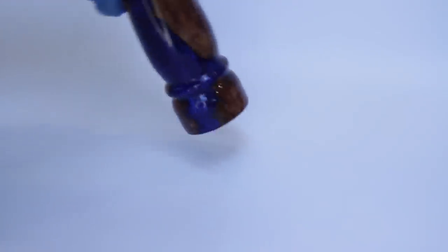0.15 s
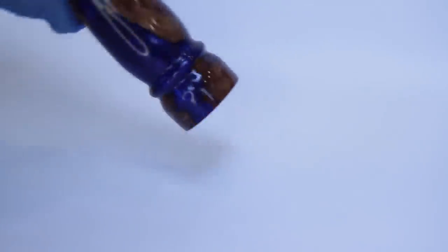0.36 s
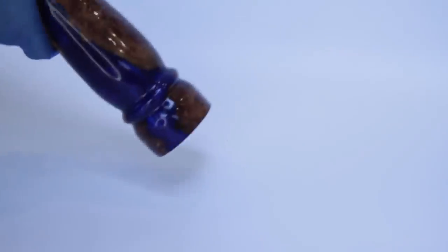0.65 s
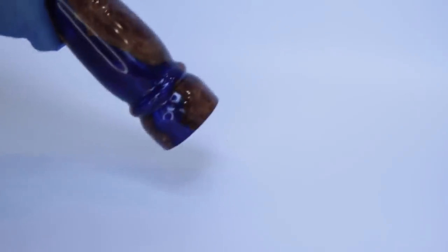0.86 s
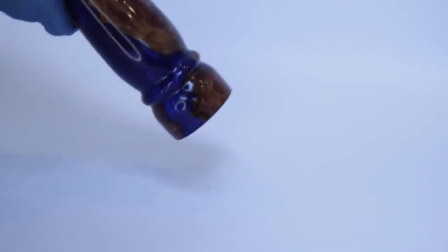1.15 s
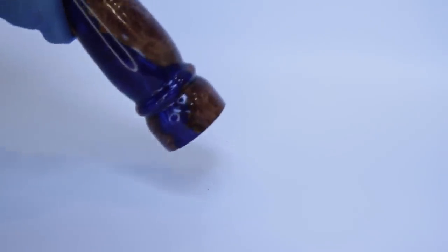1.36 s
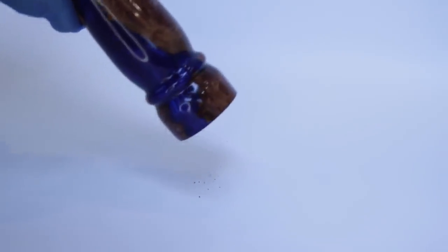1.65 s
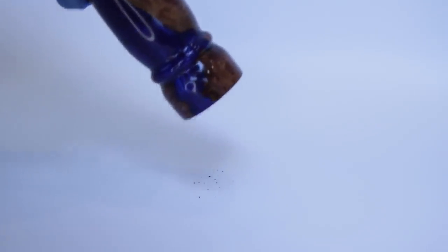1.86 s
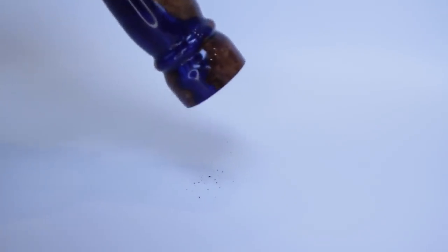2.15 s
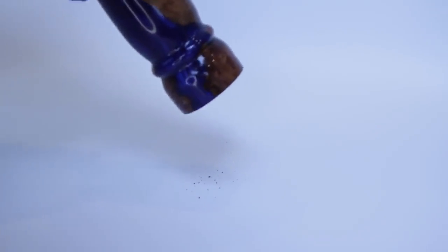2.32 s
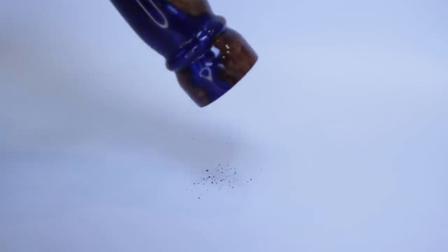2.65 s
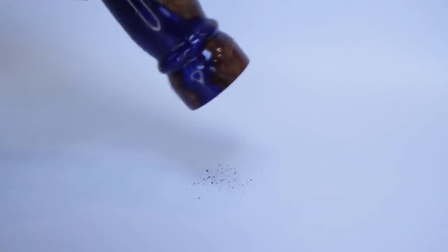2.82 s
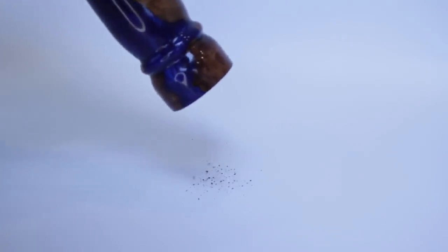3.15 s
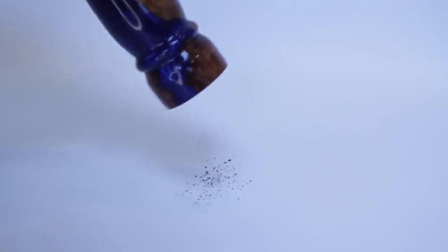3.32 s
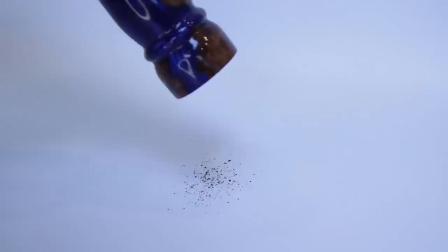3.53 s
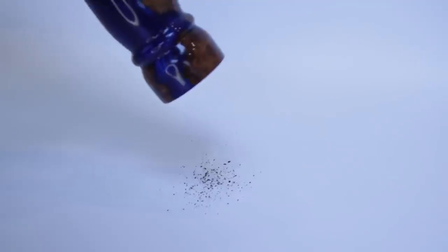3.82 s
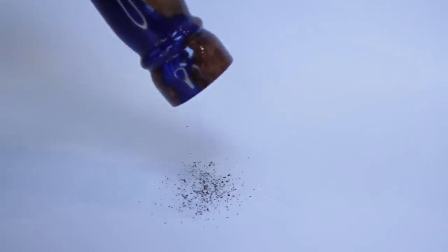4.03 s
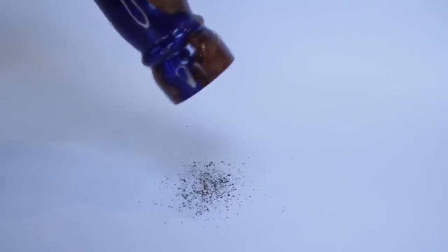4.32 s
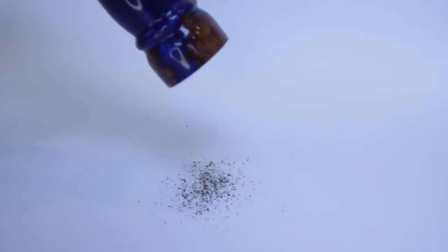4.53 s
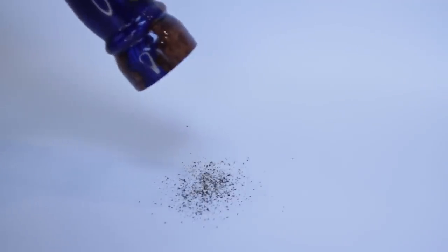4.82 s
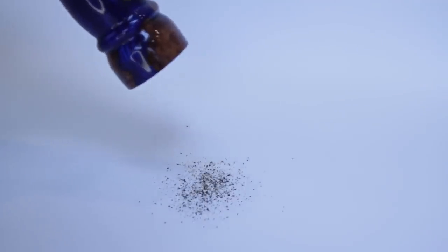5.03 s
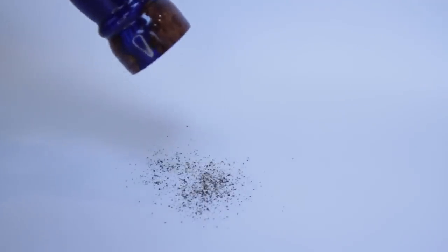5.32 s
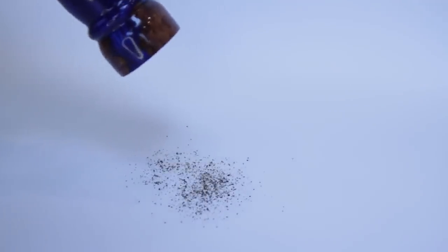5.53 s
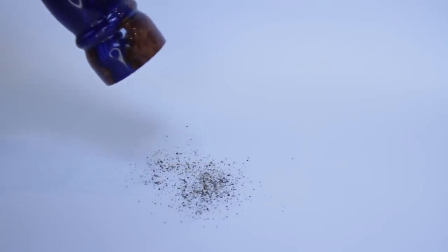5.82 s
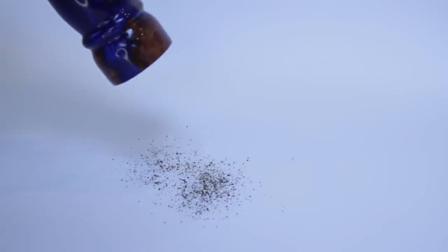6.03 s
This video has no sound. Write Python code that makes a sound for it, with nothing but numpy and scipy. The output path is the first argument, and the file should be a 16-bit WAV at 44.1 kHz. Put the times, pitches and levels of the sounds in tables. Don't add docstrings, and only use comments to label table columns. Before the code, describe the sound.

Close-up hand grinding of peppercorns in a wooden mill, in a small hard room with faint noise and a low fan drone. A dull earlier knock fades at the very start; a small crunch comes at 0.6 s. From 1.1 to 1.3 s several loud, sharp cracks break out, followed by gritty crumbling until about 1.5 s. After a lull, a tight crunch with woody knocks lands at 2.1-2.3 s, trailing into light ticks. A softer, grainy crunch runs 2.9-3.2 s, then sparse clicks. At 3.85 s a bright crack is cut short, with a tiny gap, and another strong snap follows at 3.93 s, crumbling to 4.2 s. Quiet ticks lead to dense crunching at 4.8-5.1 s. Small chips click until a last hard double crack around 5.8 s, ending in fine ticks. Echoes are short and close.

```python
import sys
import numpy as np
from scipy import signal
from scipy.io import wavfile

SR = 44100
rng = np.random.default_rng(int(sys.argv[2]) if len(sys.argv) > 2 else 0)


def invert_db(level):
    return 10 ** (np.asarray(level, dtype=float) / 20)


def dump_mix(stems):
    frames = np.atleast_2d(stems).T
    limited = np.clip(frames, -1, 1)
    pcm = np.round(limited * 32767).astype(np.int16)
    wavfile.write(sys.argv[1], SR, pcm)


N = 272044

THUD = [(331, 200, -5), (604.5, 65, -2.5), (783, 140, -2.5)]
CAVITY = [(983, 440, -6.5), (1301, 96, 2), (1517, 166, -5.5)]
SHAFT = [(1930, 730, -0.5), (2957, 276, 2), (3185, 273, 2)]
BURRS = [(3557, 730, -1.5), (4435, 650, 3), (5150, 840, 3.5), (6320, 710, 1), (6730, 600, -1)]
SHELL = [(7860, 1400, -4.5), (10940, 3630, 5), (11200, 11100, 3), (13900, 1500, -9)]
STEEL_TOP_HZ = 8500
STEADY_TOP_HZ = 16350


def rms_one(x):
    return x / np.sqrt(np.mean(x ** 2) + 1e-20)


def resonate(x, hz, width_hz):
    r = np.exp(-np.pi * width_hz / SR)
    feedback = [1, -2 * r * np.cos(2 * np.pi * hz / SR), r * r]
    return signal.lfilter([(1 - r * r) / 2, 0, (r * r - 1) / 2], feedback, x + 1e-18)


def cut(x, hz, kind="low", order=2):
    return signal.sosfilt(signal.butter(order, hz, kind, fs=SR, output="sos"), x)


def wall(x, hz):
    return signal.sosfilt(signal.cheby2(12, 60, hz, fs=SR, output="sos"), x)


def bands(x, low_hz=22):
    edges_hz = low_hz * 2 ** np.arange(0, 10, .5)
    for k, (low, high) in enumerate(zip(edges_hz, edges_hz[1:])):
        yield np.sqrt(low * high), cut(x[k % 2], [low, high], "band")


def at_hz(points, hz):
    points_hz, values = np.transpose(points)
    return np.interp(np.log(hz), np.log(points_hz), values)


def background():
    # (frequency [Hz], density [dB per Hz])
    floor_spectrum = [(15, -48), (25, -13), (102, -7), (170, -6), (200, -4), (229, -10.5), (335, -3.5),
                      (439, -8), (714, -10), (2910, -17), (3160, -16.5), (4140, -18.5), (10400, -22),
                      (16000, -30)]
    # (time [s], level [dB])
    floor_drift = [(0, -54), (.5, -53.5), (1.0, -56), (1.8, -55.5), (3.5, -55), (5.5, -55.5), (6.17, -55.5)]
    # (frequency [Hz], width [Hz], level [dB])
    hum_lines = [
        (100.2, 5.8, -75),
        (201.8, 5.5, -65),
        (10100, 1200, -75),
    ]
    knock_db, knock_t60_s, knock_top_hz = -48.5, 0.48, 2160
    t = np.arange(N) / SR

    noise = sum(invert_db(at_hz(floor_spectrum, hz)) * band for hz, band in bands(rng.standard_normal((2, N))))
    drift = invert_db(np.interp(t, *np.transpose(floor_drift)))
    drone = sum(invert_db(db) * rms_one(resonate(rng.standard_normal(N), hz, width)) for hz, width, db in hum_lines)
    dull = cut(rng.standard_normal(N), [200, knock_top_hz], "band", order=1)
    fading_knock = invert_db(knock_db - 60 * t / knock_t60_s) * rms_one(dull)
    return drift * rms_one(noise) + drone + fading_knock


def room(x):
    # (frequency [Hz], time to fall 60 dB [s])
    decay_times = [(300, 0.25), (1300, 0.32), (3000, 0.18), (6000, 0.17), (14000, 0.18)]
    # (delay [s], level [dB])
    reflections = [(.0055, -15), (.0094, -12.5), (0.0125, -14), (0.0174, -22.5), (.0212, -20.5),
                   (0.031, -48.5)]
    tail_db, tail_onset_s = -30.5, .0075
    low_hz, top_hz = 860, 12250
    t = np.arange(int(.5 * SR)) / SR

    slices = bands(rng.standard_normal((2, len(t))))
    tail = sum(band * invert_db(-60 * t / at_hz(decay_times, hz)) for hz, band in slices)
    echoes = np.zeros(len(t))
    for delay_s, echo_db in reflections:
        echoes[round(delay_s * SR)] = invert_db(echo_db)
    for lag in (7, 13, 22):
        loop = np.r_[1, np.zeros(lag - 1), -.55]
        echoes = signal.lfilter(loop[::-1], loop, echoes)
    reply = echoes + invert_db(tail_db) * tail * np.clip((t - tail_onset_s) / 0.00033, 0, 1)
    reply = cut(cut(reply, top_hz, order=1), low_hz, "high", order=1)
    return signal.fftconvolve(x, reply)[:N]


def ring(force, modes, owner, level, even=False):
    out = 0
    for k, (hz, width_hz, mode_db) in enumerate(modes):
        strength = invert_db(mode_db + 2 * rng.standard_normal(owner.max() + 1))
        if even:
            energy = np.bincount(owner, resonate(force, hz, width_hz) ** 2)
            strength /= np.sqrt(energy + 1e-12)
        out = out + (-1) ** k * resonate(force * level * strength[owner], hz, width_hz)
    return out


def crumbling(per_s=4000, spread_db=2.0, clump_s=0.0073, clump_db=2.57,
              grit_gain_db=2.0, body_gain_db=7, shell_gain_db=-4):
    # (peak [s], grit [dB], swell [s], ebb [s], body share [dB])
    surges = [(.582, -40.5, .003, .08, 1.5), (1.2, -35, 0.053, .2, -4), (1.31, -29.5, .1, 0.19, -13),
              (1.392, -28, .02, 0.1, 3.5), (1.55, -52, 0.13, 0.17, -9), (1.962, -41.5, 0.008, 0.048, 3),
              (2.078, -37.5, 0.015, 0.02, -10), (2.17, -26.5, 0.052, 0.083, -2), (2.26, -44, .1, .3, -12),
              (2.305, -33.5, 0.029, 0.039, 2.5), (2.4, -46, 0.2, 0.072, -17), (2.54, -66, .3, .1, -17),
              (2.776, -42, 0.012, 0.033, -20), (2.89, -42, .014, 0.13, -6), (2.976, -35.5, 0.018, 0.093, 4),
              (3.1, -29, 0.027, 0.07, -3.5), (3.16, -32, 0.037, 0.089, -3), (3.25, -44.5, 0.27, 0.061, 5.5),
              (3.63, -48, 0.022, 0.063, -11), (3.75, -45, 0.056, .05, 1),
                    (3.854, -27, .026, .004, -24), (3.97, -35, 0.088, 0.26, -13),
                    (4.03, -34, 0.071, 0.12, 1.2), (4.14, -28, 0.02, .035, -6), (4.24, -58, .3, 0.27, -11),
                    (4.38, -54, .3, 0.029, -18.5), (4.784, -31.5, 0.022, 0.079, -5),
                    (4.816, -29, 0.021, 0.068, -4), (4.889, -27, 0.027, 0.054, 0.5),
                    (4.99, -40.5, 0.37, 0.024, -15), (5.033, -34.5, 0.018, 0.12, 3),
                    (5.22, -48.5, .4, 0.2, -1), (5.725, -37, 0.018, 0.02, -2), (5.8, -43, .055, 0.12, 7.5),
                    (5.832, -24.5, 0.028, 0.083, -4.5), (5.95, -42.5, 0.24, 0.19, -4)]
    shell_share_db = -6.5
    t, grit_power, body_power = np.arange(N) / SR, 1e-20, 0

    for peak_s, grit_db, swell_s, ebb_s, body_db in surges:
        away = np.maximum((peak_s - t) / swell_s, (t - peak_s) / ebb_s)
        power = invert_db(2 * grit_db - 40 * away)
        grit_power = grit_power + power
        body_power = body_power + power * invert_db(2 * body_db)
    level = np.sqrt(grit_power)
    body_share = np.sqrt(body_power / grit_power)

    clump = np.cumsum(rng.random(N) < 1 / (clump_s * SR))
    grain_db = spread_db * np.minimum(rng.exponential(1, N), 5)
    sizes = invert_db(grain_db + clump_db * rng.standard_normal(N + 1)[clump])
    hits = rng.choice([-1, 1], N) * (rng.random(N) < per_s / SR)
    grains = level * rms_one(sizes * hits)

    steel = cut(ring(grains, SHAFT + BURRS, clump, invert_db(grit_gain_db)), STEEL_TOP_HZ)
    shell = ring(grains, SHELL, clump, invert_db(shell_share_db) * invert_db(shell_gain_db))
    body = ring(grains, THUD + CAVITY, clump, body_share * invert_db(body_gain_db))
    return steel + shell + body


def splinter(s, parts):
    break_ms, growth = 2.9, .2
    order = np.argsort(s)
    s, levels_db = s[order], [db[order] for _, db, _ in parts]
    owner = np.clip(np.searchsorted(s * SR, np.arange(N)) - 1, 0, len(s) - 1)
    length_ms = break_ms * invert_db(growth * np.max(levels_db, axis=0))
    age = np.clip((np.arange(N) / SR - s[owner]) * 1000 / length_ms[owner], 0, 30)
    force = rng.standard_normal(N) * age ** .4 * np.exp(-2.6 * age)
    return [ring(force, modes, owner, invert_db(db + gain_db)[owner], even=True)
            for (modes, _, gain_db), db in zip(parts, levels_db)]


def cracks(burr_db=-4, thud_db=-1.0, cavity_db=-2.3, shaft_db=-3.0, shell_db=-4.5):
    # (time [s], burr ring [dB], cavity knock [dB], shell edge
    # [dB])
    corns = [(0.581, -21, -38, -44), (0.614, -16, -16, -11), (1.1265, 9, 6.5, 10.5),
             (1.1835, 6.5, 0.5, 2.5), (1.2477, 10.5, -1, 6.5), (1.2936, -14, -10, -10),
             (1.3942, -15, -8, -28), (1.41, -7, -11, -29), (1.4209, -10, -4, -24), (1.502, -15.5, -16, -32),
             (1.8925, -31, -15, -37), (1.9848, -24, -22.5, -44), (2.0742, -25.5, -26, -40),
             (2.1166, -6, -4.5, -15), (2.14, 4.5, 2, -9.5), (2.1518, -0.5, -4, -7), (2.187, -18, -10, -13),
             (2.23, -14, -16, -27), (2.237, -11.5, -20, -26), (2.298, -28, -18, -37),
             (2.3079, -18, -20.5, -21), (2.379, -6.5, -18.5, -34), (2.9155, -21, -22.5, -31),
             (2.979, -3.5, -14.5, -36), (3.091, -39, -8.5, -33), (3.101, -24, -20, -23),
             (3.1197, -22, -18, -35), (3.149, -22, -13, -32), (3.161, -9.5, -8.5, -37),
             (3.256, -17, -33, -28),
             (3.64, -25.5, -11.5, -19), (3.7446, -28, -23, -32), (3.8393, -15, -4.5, -11),
                   (3.848, 2, -0.5, -29), (3.9006, -17, -15, -35), (3.93, 8.5, 2, -0.5),
                   (4.04, -0.5, -4, -9), (4.128, -11, -17, -35), (4.137, -12.5, -9.5, -40),
                   (4.1595, -32, -2.5, -35), (4.1961, -.6, -21.5, -5), (4.424, -50, -27, -57),
                   (4.6504, -19.5, 0, -36), (4.696, -50, -16, -45), (4.7736, -21, -18.5, -27.5),
                   (4.793, -15, -20, -31), (4.814, -15, -15.5, -22), (4.8304, -4.5, -24, -7.5),
                   (4.8774, -12.5, -3.5, -37), (4.8997, -27, -16, -31), (5.0265, -10.5, -28, -29),
                   (5.033, -18, -13.5, -30), (5.0549, -37, -3.5, -28), (5.0675, -2, -18, -18),
                   (5.08, -17, -9, -16), (5.0883, -51, -2.5, -32), (5.8222, 4.5, -0.5, -3),
                   (5.7604, -10, -32, -19), (5.7721, -0.2, -17, -12), (5.8133, 9, -4, 2.5)]
    # (time [s], burr ring [dB], shell edge [dB])
    small_chips = [(0.626, -31, -4.5), (0.7804, -25.5, -39), (.891, -34, -45), (1.052, -34, -45),
                   (1.08, -17.5, -24), (1.111, -11.5, -13), (1.6176, -29.5, -27.5), (2.087, -26.5, -36),
                   (2.352, -21, -24), (2.4034, -17, -22), (2.444, -32, -34), (2.465, -26.5, -29),
                   (2.4968, -25, -25), (2.5346, -29.5, -28), (2.592, -33, -45), (2.73, -31, -30),
                   (2.7725, -37, -23), (2.7823, -17.5, -24), (2.881, -34, -45), (2.9277, -21, -25),
                   (3.2872, -28, -30), (3.3027, -20, -25), (3.318, -20.5, -23), (3.3547, -24, -27),
                   (3.408, -30, -38), (3.4308, -28, -42), (.776, -45, -35), (1.884, -34, -21),
                   (2.126, -13, -16), (2.507, -25.5, -33),
                   (3.6183, -36, -29), (3.833, -23, -35), (3.906, -8.5, -20), (4.291, -23.5, -47),
                   (4.312, -23, -28), (4.443, -35, -46), (4.6178, -30, -25), (4.64, -49, -25.5),
                   (4.7684, -12.5, -19), (4.996, -20, -23), (5.1483, -24, -21), (5.175, -30, -35),
                   (5.192, -15.5, -17.5), (5.2521, -19.5, -19), (5.3316, -27, -45), (5.507, -35, -36),
                   (5.5492, -27, -27), (5.697, -36, -40), (5.721, -24, -39), (5.9392, -21, -30),
                   (5.983, -32, -23), (5.9965, -25, -25), (6.0027, -35, -28), (6.013, -35, -22),
                   (6.0176, -27, -21.5), (6.0455, -40, -22), (4.966, -40, -28), (5.111, -26, -21),
                   (5.263, -25, -21), (5.784, -14, -14)]
    # (time [s], thud [dB])
    jerks = [(0.613, -19.5), (1.2472, -2), (1.412, -5.5), (1.4216, -12.5), (1.5039, -22), (1.666, -20),
             (1.8926, -8.5), (1.9587, -20.5), (1.9854, -20), (2.074, -29), (2.139, -3), (2.1517, -4.5),
             (2.229, -11), (2.2971, -35), (2.9808, -32), (3.099, -23), (3.162, -10), (3.64, -21),
             (3.849, -4), (3.9005, -18), (3.931, -4.5), (4.135, -11.5), (4.8303, -25), (5.034, -23),
             (5.0524, -6), (5.7727, -19)]
    shaft_from_burr, thud_under_cavity_db, chip_under_burr_db = 0.52, 11.5, 20.5
    body_top_hz = 2600

    chips = [(s, burr, burr - chip_under_burr_db, shell) for s, burr, shell in small_chips]
    s, burr, knock, edge = np.transpose(corns + chips)
    link = shaft_from_burr * burr + (1 - shaft_from_burr) * knock
    burrs, thud, cavity, shaft, shell = splinter(s, [
        (BURRS, burr, burr_db),
        (THUD, knock - thud_under_cavity_db, thud_db),
        (CAVITY, knock, cavity_db),
        (SHAFT, link, shaft_db),
        (SHELL, edge, shell_db)])
    jerk_s, jerk_db = np.transpose(jerks)
    thud = thud + splinter(jerk_s, [(THUD, jerk_db, thud_db)])[0]
    return cut(shaft - burrs, STEEL_TOP_HZ) + shell + cut(thud - cavity, body_top_hz)


def scene():
    change_s, low_cut_hz = 3.8565, 290
    t = np.arange(N) / SR
    mill = cracks() + wall(crumbling(), STEADY_TOP_HZ)
    mill = cut(mill, low_cut_hz, "high", order=3)
    early = mill * (t < change_s)
    late = mill * (t > change_s + .04)
    before = np.clip((change_s - t) / .001, 0, 1)
    steady = room(early) * before + room(late) + background()
    return (early * before + late + wall(steady, STEADY_TOP_HZ))[None]


def roll_off(x):
    return signal.sosfilt(signal.butter(12, 16740, fs=SR, output="sos"), x)


def record(dry):
    mic_top_hz = 16900
    mix = np.clip(wall(dry, mic_top_hz), -1, 1)
    return roll_off(mix)


dry = scene()
out = record(dry)
dump_mix(out)
```